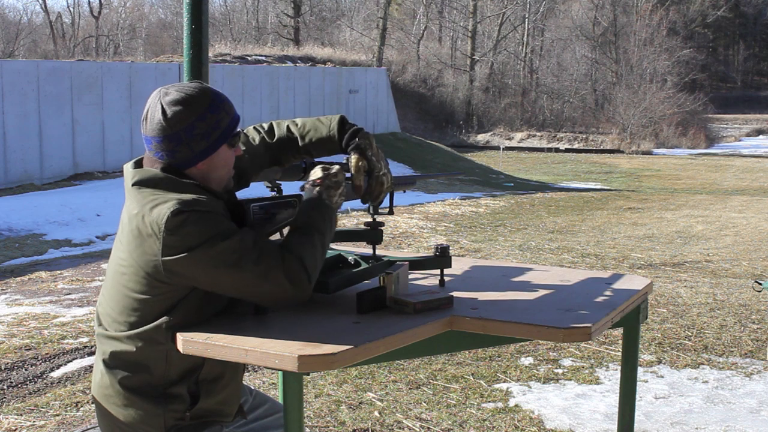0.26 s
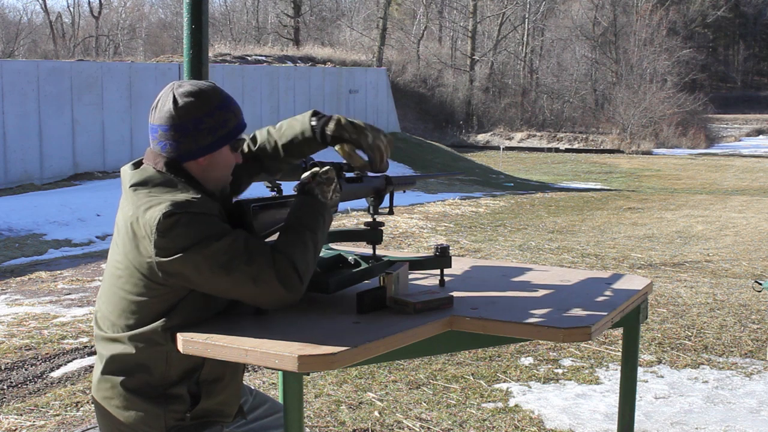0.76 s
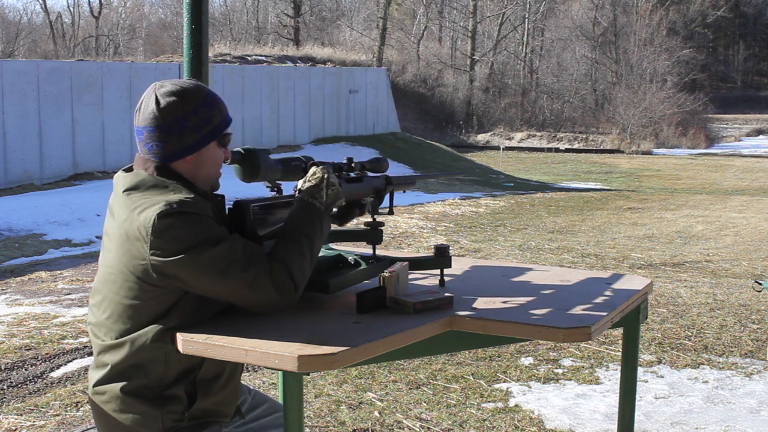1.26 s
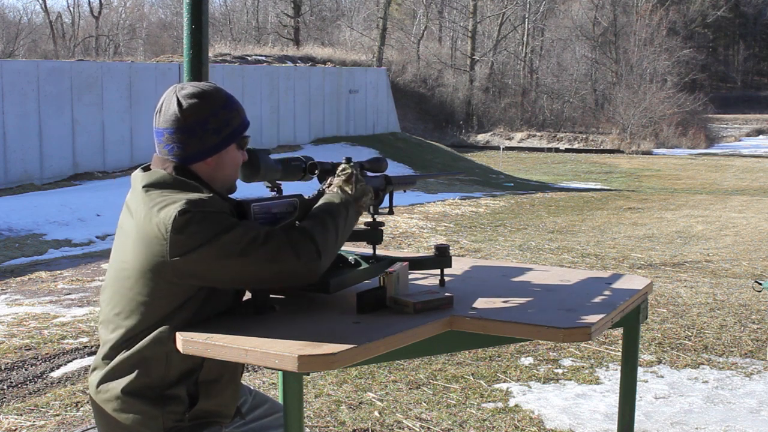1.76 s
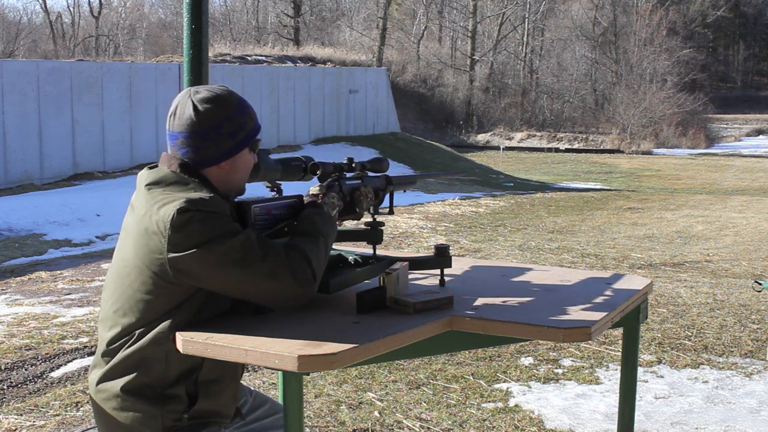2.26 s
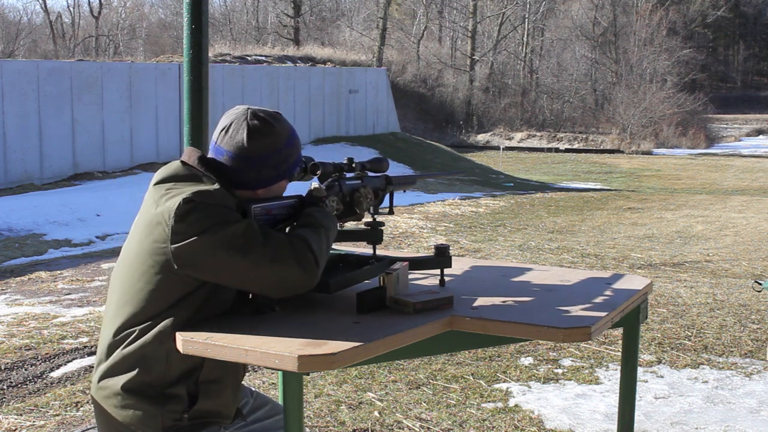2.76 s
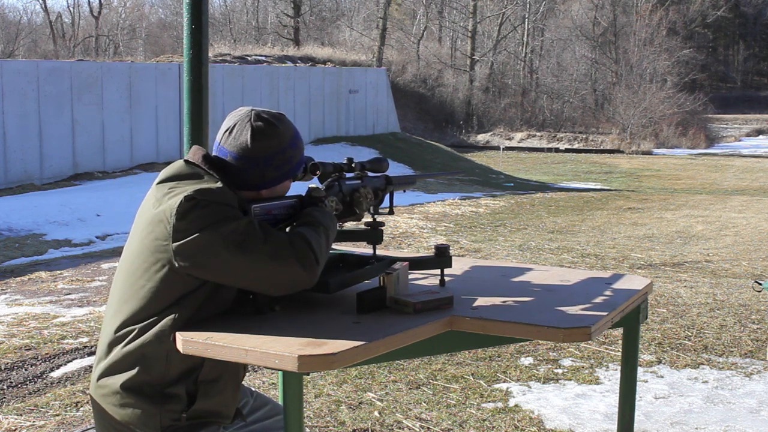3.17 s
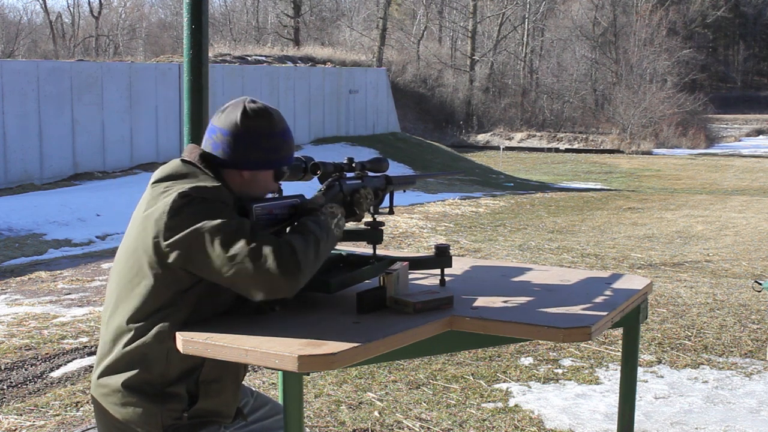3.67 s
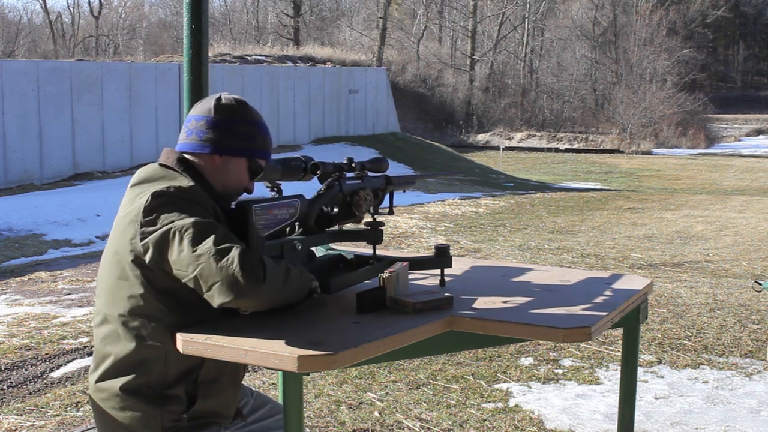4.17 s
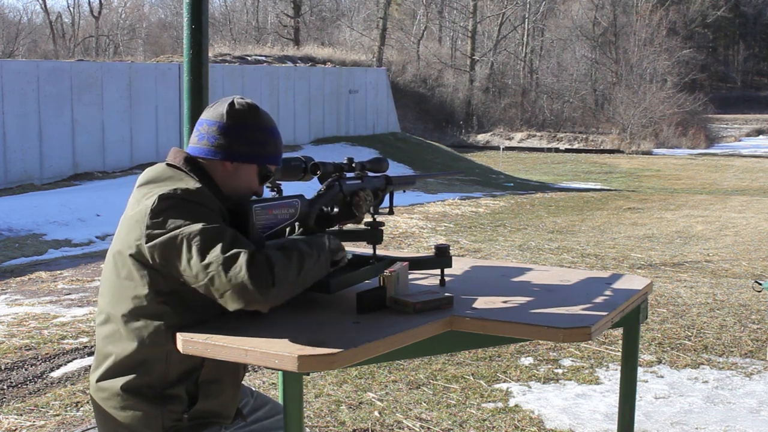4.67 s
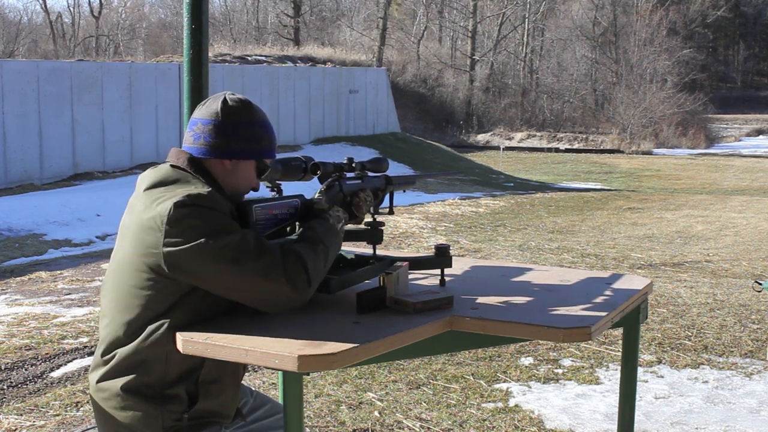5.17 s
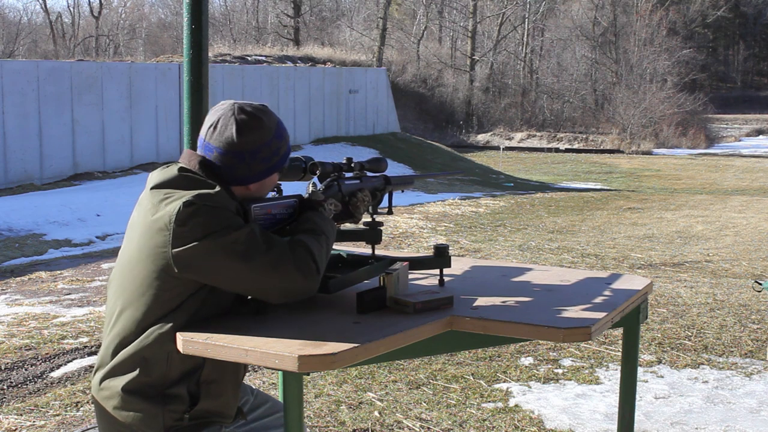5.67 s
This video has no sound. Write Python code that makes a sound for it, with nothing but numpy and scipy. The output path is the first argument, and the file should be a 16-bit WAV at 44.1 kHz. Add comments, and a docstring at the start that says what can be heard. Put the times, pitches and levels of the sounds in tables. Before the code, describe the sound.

Outdoors at a shooting bench, a steel rifle bolt is knocked and scraped back. A brass case strikes a steel frame with a bright ring and bounces away; the bolt is worked forward with hard clacks. Strong wind then thumps the close microphone, covering faint scuffs, before another case clinks on the frame. Knocks echo briefly under a shelter.

```python
"""Gusts rumble and flutter at the microphone from the start, over far outdoor noise and rustling clothes.
Soon a rifle bolt knocks and scrapes: short noise bursts, ringing steel and gritty rubbing.
A brass case hits a steel frame, rings as fading sines and bounces away over hard ground; the bolt is worked again.
The wind then swells into strong buffets, with soft scuffs on the bench; late on, a case drops on the frame again.
The knocks and clacks echo in an open shelter."""
import sys
import numpy as np
from scipy import signal
from scipy.fft import rfft, irfft
from scipy.io import wavfile
from scipy.ndimage import uniform_filter1d

SR = 44100
rng = np.random.default_rng(int(sys.argv[2]) if len(sys.argv) > 2 else 0)


def inscribe(sig):
    """Save sig as 16-bit PCM at rate SR to the path in sys.argv[1].

    A 1-D sig is mono; a 2-D sig holds one channel per row.
    Samples are clipped to [-1, 1] before scaling.
    """
    pcm = np.round(np.clip(np.atleast_2d(sig).T, -1, 1) * 32767)
    wavfile.write(sys.argv[1], SR, pcm.astype(np.int16))


N = 261072  # length in samples

# Far outdoor noise, its balance of pitches: pitch_hz, level_db (per Hz)
FAR_SPECTRUM = [(18, -44), (30, -13), (65, -6.5), (146, -16.5), (332, -20), (593, -13.5), (835, -17),
                (1060, -17.5), (3480, -36), (7280, -42.5), (13400, -40.5), (15200, -46), (16500, -60)]
FAR_DB = -54
# Rubbing cloth, its balance of pitches: pitch_hz, level_db (per Hz)
CLOTH_SPECTRUM = [(590, -29), (1000, 2), (1050, -5.5), (1190, -3), (6160, -16.5), (14000, -16.5),
                  (15900, -23), (16500, -48)]
# Spells of rustling clothes: start_s, length_s, level_db
RUSTLES = [(0, 0.11, -50), (.14, 0.24, -44.5), (1.9, 0.19, -60.5), (2.27, 0.17, -61.5), (2.49, 0.21, -61),
           (2.75, 0.23, -65.5), (3.31, 0.044, -62.5), (3.57, 0.71, -66.5), (4.33, 0.068, -56),
           (4.55, 0.3, -65.5), (5.2, .25, -67), (5.5, 0.17, -60), (5.8, .12, -61.5)]
RUSTLE_RISE, RUSTLE_FALL = 270, 110  # dB per s
# Something slides on the bench: start_s, length_s, level_db
BENCH_SCUFFS = [(3.741, 0.096, -56), (4.057, 0.041, -56.5), (4.102, 0.019, -56), (4.219, 0.058, -55.5),
                (5.455, 0.041, -57.5)]
# Tones of the bench: pitch_hz, width_hz, level_db
BENCH_TONES = [(1500, 400, 0), (2350, 700, -7)]

# Wind beneath the gusts, joined by straight lines: time_s, wind_db
WIND_LEVEL = [(0, -55), (.75, -53.5), (1, -78), (1.06, -53.5), (1.8, -63), (2.55, -41), (2.63, -30),
              (3.8, -29), (3.84, -77), (4.05, -70), (4.1, -27), (4.5, -43), (4.58, -55), (4.65, -45.5),
              (4.96, -85), (5.02, -62), (5.279, -77), (5.4, -44), (5.92, -46)]
# Gusts that can exceed that level: start_s, length_s, wind_db
WIND_GUSTS = [(0, .004, -19), (.19, 0.016, -20.5), (.42, 0.035, -32.5), (.575, .05, -36),
              (1.33, 0.017, -34.5), (1.44, 0.013, -27.5), (1.6, 0.021, -38.5), (1.71, 0.022, -47),
              (1.96, .01, -28.5), (2.052, 0.0081, -29.5), (2.13, .035, -31), (2.25, 0.022, -33.5),
              (2.34, 0.018, -41), (2.6, 0.11, -16), (2.785, 0.018, -15), (2.97, 0.053, -17.5),
              (3.165, .02, -14), (3.352, 0.029, -9), (3.475, 0.095, -15), (3.625, 0.12, -18.5),
              (3.91, 0.067, -24.5), (4.088, 0.021, -20.5), (4.205, .055, -25), (4.3, .12, -23.5),
              (4.47, .05, -28), (5.5, 0.09, -37)]
GUST_RISE, GUST_FALL = 596, 650  # dB per s
# Swirls of air from large to small: pitch_hz, level_db, follow (dB gained per dB of wind)
EDDIES = [(45, -9.5, 0.38), (71.6, -3, 0.52), (115, 2.5, 0.61), (176.0, 0.5, 0.77), (272.7, -5.5, 1.167),
          (423.6, -18, 1.61), (712, -27.5, 1.65), (1200, -36, 1.26), (2024, -53, 0.89)]
# The strongest single buffets: time_s, level_db, edge_db (rough flick against the swing)
STRONG_BUFFETS = [(0.1863, -16, -19), (0.208, -16, -30), (2.604, -18, -32), (2.6248, -11, -37),
                  (2.672, -9, -41), (2.6999, -8.5, -43), (2.715, -14.5, -22), (2.7303, -12.5, -25),
                  (2.787, -12, -37), (2.9705, -11, -45), (2.981, -8.5, -18.5), (3.0241, -11.5, -12),
                  (3.1787, -11.5, -20.5), (3.193, -12, -24), (3.335, -22, -14), (3.358, -9, -15),
                  (3.375, -6, -16), (3.407, -11.5, -17.5), (3.48, -16, -35), (3.509, -11, -31),
                  (3.523, -14.5, -19), (3.5356, -12, -37), (3.573, -14, -32), (3.622, -9, -24),
                  (3.6493, -15, -41.5), (3.7143, -13.5, -34), (3.914, -18, -18.5), (3.939, -12.5, -42),
                  (4.086, -15.5, -17), (4.213, -13, -40), (4.263, -21, -14), (4.3116, -12, -18),
                  (4.326, -21, -14), (4.408, -15, -30), (4.4711, -17, -30.5)]
BUFFET_HZ, BUFFET_HZ_PER_DB = 280.4, 6.5  # middle pitch at 0 dB; weaker buffets are slower
BUFFET_SPREAD = .25  # whole width of the chance pitch range, as a share of the pitch

# Knocks of the bolt: time_s, level_db, treble_db, strongest_ring_db (steel), case_ring_db (case inside)
BOLT_KNOCKS = [(0.093, -25, -32, -48, -70), (0.156, -22.5, 0, -54, -50), (0.2288, -19, -6.5, -43, -38.5),
               (0.2464, -3.5, 10, -42, -30), (0.313, -15.5, 4, -39.5, -33.5),
               (0.3344, -4, -7.5, -18, -30.5), (1.6309, -8, -4.5, -9, -42), (1.6496, -16.5, -7, -25, -33),
               (1.6768, -6, -9, -38, -28), (1.7037, -2.5, -7.5, -37, -39), (1.835, -17.5, -13, -48, -38),
               (1.8687, -7, -4.5, -37, -58), (2.4146, -16.5, -7.5, -41.5, -55),
               (3.8978, -27, -25, -74, -70), (4.0102, -32.5, -23, -70, -70)]
# Balance of pitches in a knock: pitch_hz, level_db (per Hz)
KNOCK_SPECTRUM = [(180, -50.5), (300, -16), (2380, -3.5), (3280, -5), (4280, -4.5), (7560, -6.5),
                  (9080, -8), (13800, -1), (16300, -14)]
# Ringing tones of the steel action, strongest first: pitch_hz, level_db, time_to_fall_60_db_s
ACTION_TONES = [(3110, 0, .05), (1000, -8, .035), (1770, -13, .02), (2300, -11, .025), (2500, -12, .03),
                (2930, -10, .03), (3400, -14, .025), (3900, -14, .025), (4480, -13, .025), (5600, -17, .02),
                (7300, -18, .02), (13000, -16, .02), (14300, -16, .04)]
KNOCK_T60_S = 0.041  # time to fall 60 dB
ACTION_RING_DB = -29  # base level of the weaker tones against the knock
# Sliding strokes of the bolt: start_s, length_s, friction_db, treble_db (against the mids)
BOLT_STROKES = [(0.166, 0.093, -38.5, -5), (0.32, 0.017, -36, -2.5), (1.635, .065, -25, -7),
                (1.85, .015, -34, -3)]
STROKE_RISE, STROKE_FALL = 265, 580  # dB per s

# Landings of the case: time_s, level_db, treble_db, frame_ring_db, case_ring_db, lowest_case_tone_db
CASE_LANDINGS = [(0.6228, -2.5, -10, -20.5, -24, -45), (0.7178, -22, -24, -37.5, -39, -31),
                 (0.7825, -18, -36, -34, -45, -60), (0.8494, -9, -1, -25, -29, -35),
                 (0.8881, -10.5, -30, -44, -32, -49), (0.9512, -18, -16, -33, -46, -46),
                 (1.0897, -11, -27, -42.5, -26, -28.5), (1.2623, -12.5, -15, -46.5, -26, -22),
                 (1.4176, -14, -38.5, -50, -30, -37), (1.5246, -12.5, -28.5, -40, -26.5, -35),
                 (1.6135, -15.5, -29, -31, -28.5, -30), (4.8042, -3, -3.5, -36, -22.5, -50),
                 (4.8112, -6.5, -9, -23, -27, -45), (4.8664, -32, -12, -46, -49, -45),
                 (4.8944, -22, -15, -40.5, -37, -60), (4.935, -30, -25, -47, -37, -46),
                 (4.9917, -24, -19, -40, -39.5, -48), (5.0315, -28, -23, -45, -54, -46),
                 (5.054, -29, -25, -45, -48.5, -50)]
# Balance of pitches in a landing's clack: pitch_hz, level_db (per Hz)
CLACK_SPECTRUM = [(180, -45.5), (300, -27), (1580, -9), (1930, -11), (2480, -8.5), (3760, -1.5),
                  (9090, -11), (9880, -3.5), (14500, -24), (16000, -36.5)]
# Ringing tones of the brass case, lowest first: pitch_hz, level_db, time_to_fall_60_db_s
BRASS_TONES = [(7612, 0, .22), (9700, -13, .2), (9865, 0, .26), (9885, -7, .26), (11500, -30, .1),
               (14040, -12, .18), (14075, -20, .18)]
# Ringing tones of the steel frame, hum first: pitch_hz, level_db, time_to_fall_60_db_s
FRAME_TONES = [(807, 0, .42), (533, -14, .2), (1147, -15, .3), (1416, -14, .4), (1930, -12, .4),
               (2062, -14, .5), (2085, -36, 1.6), (2250, -2, .1), (2600, -22, .45), (3128, -1, .19),
               (3440, -20, .3), (3690, -3, .1), (3750, -37.5, 1.8), (4400, -3, .08), (4850, -22, .3),
               (5483, -21, .3), (5700, -22, .3), (6315, -19, .2)]
CLACK_T60_S, T60_S_PER_DB = .058, -.0022  # fade at 0 dB and its change: soft landings clatter longer
HUM_DB = -2.5  # hum of the frame against its other tones, at a frame ring of -23 dB
HUM_GROWTH = .6  # hard blows raise the hum further: extra dB per dB of frame ring
GROUND_LOWS = .4  # the less the frame rings, the more the ground adds below 2 kHz: dB per dB
# Dull taps of the case's other end between bounces on the ground: time_s, level_db
DULL_TAPS = [(1.156, -32), (1.1737, -24), (1.2092, -28), (1.235, -32), (1.312, -26), (1.3376, -25),
             (1.365, -28), (1.39, -32), (1.4648, -23), (1.498, -25), (1.5208, -21)]
TAP_TREBLE_DB, TAP_T60_S = -46.5, .045
# Moments when the case is stilled: time_s
STILLED_TIMES = [1.632, 5.13]
STOP_S = .012  # its ring then shrinks to about a third in each such time

# Fading of the shelter's echo: pitch_hz, time_to_fall_60_db_s
SHELTER_FADE = [(400, 0.42), (1000, 0.35), (2800, 0.24), (7400, 0.22), (15000, 0.1)]
EDGE_HZ = 16000  # upper limit of the microphone's sound


def gain_of(db):
    """Turns decibels into a factor."""
    return 10 ** (np.asarray(db) / 20)


def evened(x):
    """Scales a sound to an rms (average strength) of 1."""
    return x / np.sqrt(np.mean(x ** 2) + 1e-20)


def read(points, hz):
    """Reads a table at the pitches hz, with straight lines over a logarithmic pitch scale."""
    f, value = np.transpose(points)
    return np.interp(np.log(hz + 1), np.log(f + 1), value)


def add(mix, s, sound):
    """Lays a sound into the mix at s seconds."""
    part = mix[round(s * SR):][:len(sound)]
    part += sound[:len(part)]


def coloured(x, db_of):
    """Filters x by a level in dB that depends on pitch."""
    hz = np.fft.rfftfreq(len(x), 1 / SR)
    return irfft(rfft(x) * gain_of(db_of(hz)), len(x))


def spells(rows, rise, fall):
    """Level in dB of events (start, length, dB) that each rise, hold and fall."""
    start, length, db = np.transpose(rows)[:3, :, None]
    t = np.arange(0, N + 64, 64) / SR
    before = np.maximum(start - t, 0)
    after = np.maximum(t - start - length, 0)
    each_db = db - rise * before - fall * after
    return np.interp(np.arange(N) / SR, t, each_db.max(0))


def patchy(spectrum, patchy_db, size):
    """Noise built from short random spectra, with louder and softer patches that drift."""
    frames, hz = 4 * N // size + 5, np.fft.rfftfreq(size, 1 / SR)
    real, imaginary, patches = rng.standard_normal((frames, len(hz), 3)).T
    patches = uniform_filter1d(patches, size=9, axis=0)
    patches = evened(uniform_filter1d(patches, size=12, axis=1))
    level_db = read(spectrum, hz)[:, None] + patchy_db * patches
    spectra = (real + 1j * imaginary) * gain_of(level_db)
    return evened(signal.istft(spectra, nperseg=size, noverlap=3 * size // 4)[1][:N])


def background():
    """Far outdoor noise, clothing that rustles as the arms move, and scuffs that excite the bench's tones."""
    far = gain_of(FAR_DB) * patchy(FAR_SPECTRUM, patchy_db=2.0, size=1024)
    rustle_gain = gain_of(spells(RUSTLES, RUSTLE_RISE, RUSTLE_FALL))
    out = far + rustle_gain * patchy(CLOTH_SPECTRUM, patchy_db=3.0, size=256)
    for s, length, db in BENCH_SCUFFS:
        noise = rng.standard_normal(round(length * SR))
        wood = np.zeros(len(noise))
        for hz, width_hz, tone_db in BENCH_TONES:
            b, a = signal.iirpeak(hz, hz / width_hz, SR)
            wood += gain_of(tone_db) * signal.filtfilt(b, a, noise)
        add(out, s, gain_of(db) * evened(wood) * signal.windows.tukey(len(noise), .4))
    return out


def puff(hz, edge_db, turns=0.45):
    """One eddy pushes the membrane: a lumpy swing of about a cycle, with a short rough flick at its top."""
    t = np.arange(-1500, 1500) / SR
    swing = np.exp(-.5 * (t * hz / turns) ** 2) * np.cos(2 * np.pi * (hz * t + rng.uniform(-0.11, 0.1)))
    flick_spectrum = [(300, -3.5), (700, 9.0), (1600, -7.0), (2800, -25), (4000, -52)]
    flick = coloured(rng.standard_normal(len(t)), lambda f: read(flick_spectrum, f))
    edge = evened(flick) * np.exp(-.5 * (t / 0.0021) ** 2)
    return rng.choice([-1, 1]) * (swing + gain_of(edge_db) * edge)


def wind():
    """Eddies of many sizes push the microphone; small ones gain more from stronger wind than the largest."""
    s, db = np.transpose(WIND_LEVEL)
    steady_db = np.interp(np.arange(N) / SR, s, db)
    wind_db = np.maximum(steady_db, spells(WIND_GUSTS, GUST_RISE, GUST_FALL))
    out = np.zeros(N)
    for hz, level_db, follow in EDDIES:
        # small eddies are rarer for their size and so stand out as single flicks
        draw, sign, luck = rng.random((N, 3)).T
        happens = draw < 130 * (115 / hz) ** .4 / SR
        strength = gain_of(-3. * np.log(luck + 0.00078))
        train = happens * np.sign(sign - .5) * strength
        eddies = evened(signal.oaconvolve(train, puff(hz, -60), "same"))
        out += eddies * gain_of(-37.0 + level_db + follow * (wind_db + 31))
    for s, db, edge_db in STRONG_BUFFETS:
        middle_hz = BUFFET_HZ + BUFFET_HZ_PER_DB * db
        hz = middle_hz * (1 + BUFFET_SPREAD * (rng.random() - .5))
        add(out, s - 1500 / SR, gain_of(db) * puff(hz, edge_db))
    return out


def tilt(hz, treble_db):
    """A treble shelf whose change builds up from 2 to 9 kHz."""
    return read([(2000, 0.00079), (9000, treble_db)], hz)


def burst(db_of, t60, rise, spike_db, treble_haste=0.87):
    """Dense short tones bunched in chance bands: a sharp front, then a tail whose treble fades a bit slower."""
    t = np.arange(8192) / SR
    noise, bands = rng.standard_normal((len(t), 2)).T
    bands = uniform_filter1d(uniform_filter1d(bands, size=40), size=40)
    bands_db = 2 * evened(bands)[:len(t) // 2 + 1]  # bands stand about 2 dB out
    x = evened(coloured(noise, lambda hz: db_of(hz) + bands_db))
    highs = coloured(x, lambda hz: read([(3500, -50.5), (6000, -6)], hz))
    fall_db = -60 * t / np.clip(t60, .008, .3)
    tail = (x - highs) * gain_of(fall_db) + highs * gain_of(treble_haste * fall_db)
    spike = x * gain_of(spike_db) * np.exp(-t / 0.0021)
    return 0.32 * (1 - np.exp(-t / rise)) * (tail + spike)


def ring(modes, first_db, rest_db, cycles, first_cycles, spin_db=0., scatter_db=0.0):
    """Fading sines that build up over some cycles; tone levels vary by blow, and a spinning body wavers."""
    hz, db, t60 = np.transpose(modes)[:, :, None]
    t = np.arange(round(SR * min(t60.max(), .9))) / SR
    luck, phase, spin, start = rng.random((len(modes), 4)).T[:, :, None]
    first = hz == hz[0]
    level_db = db + np.where(first, first_db, rest_db) + scatter_db * 3.1 * (luck - .5)
    waver_hz = 4.2 + 20. * spin
    level_db = level_db + spin_db * np.sin(2 * np.pi * (waver_hz * t + start))
    build = 1 - np.exp(-t * hz / np.where(first, first_cycles, cycles))
    tones = gain_of(level_db - 60 * t / t60) * np.sin(2 * np.pi * (hz * t + phase)) * build
    return tones.sum(0)


def slide(row):
    """Steel rubs on steel: hiss, and grit of which each grain rings one tone of the action."""
    draw, luck, hiss = rng.random((N, 3)).T
    grains = (draw < 1300 / SR) * gain_of(-4.5 * np.log(luck + 0.00057))
    mode = rng.integers(0, len(ACTION_TONES), N)
    t = np.arange(2000) / SR
    grit = np.zeros(N)
    for k, (hz, db, t60) in enumerate(ACTION_TONES):
        # the strongest tones are held back, and every tone fades a little faster than in a knock
        tone = gain_of(min(db, -9.5) - 65 * t / t60) * np.sin(2 * np.pi * hz * t)
        grit += signal.oaconvolve(grains * (mode == k), tone)[:N]
    steel_hiss = coloured(hiss - .5, lambda hz: read(KNOCK_SPECTRUM, hz))
    rub = evened(evened(grit) + 0.77 * evened(steel_hiss))
    highs = coloured(rub, lambda hz: read([(4500, -36.0), (7000, 5.5)], hz))
    balanced = rub + (gain_of(row[3]) - 1) * highs
    return gain_of(spells([row], STROKE_RISE, STROKE_FALL)) * balanced


def bolt():
    """Steel parts knock at lugs and stops, ringing the action and the case, with sliding between them."""
    out = np.zeros(N)
    held = np.multiply(BRASS_TONES, [1, 1, .5])[1:]  # a gripped case dies twice as fast; lowest tone left out
    for s, db, treble_db, strongest_db, brass_db in BOLT_KNOCKS:
        steel = ring(ACTION_TONES, strongest_db, db + ACTION_RING_DB,
                     cycles=3.4, first_cycles=9.2, scatter_db=0.5)
        brass = ring(held, brass_db, brass_db, cycles=27.0, first_cycles=27., spin_db=7.0)
        knock = burst(lambda hz: read(KNOCK_SPECTRUM, hz) + tilt(hz, treble_db),
                      KNOCK_T60_S, rise=0.001, spike_db=4.5 + .4 * db)
        for sound in (steel, brass, gain_of(db) * knock):
            add(out, s - .001, sound)
    return out + sum(slide(row) for row in BOLT_STROKES)


def case():
    """Each landing clacks and rings the spinning brass tube and, to a varying degree, the steel frame."""
    clacks, rings = np.zeros((2, N))
    for s, db, treble_db, frame_db, brass_db, lowest_db in CASE_LANDINGS:
        hum_db = frame_db + HUM_DB + HUM_GROWTH * (frame_db + 23.)
        frame = ring(FRAME_TONES, hum_db, frame_db, cycles=8.9, first_cycles=21.0, spin_db=1.8, scatter_db=1.2)
        add(rings, s - .001, frame)
        brass = ring(BRASS_TONES, lowest_db, brass_db, cycles=4.3, first_cycles=160.0, spin_db=1.5)
        next_stop = min(stop for stop in STILLED_TIMES if stop > s)
        late = s + np.arange(len(brass)) / SR - next_stop
        add(rings, s - .001, brass * np.exp(-np.maximum(late, 0) / STOP_S))
        lows = [(1900, GROUND_LOWS * (db - frame_db - 26.)), (2700, 0)]
        clack = burst(lambda hz: read(CLACK_SPECTRUM, hz) + read(lows, hz) + tilt(hz, treble_db),
                      CLACK_T60_S + T60_S_PER_DB * db, rise=.0022, spike_db=1.5 + .3 * db)
        add(clacks, s - .0015, gain_of(db) * clack)
    for s, db in DULL_TAPS:
        tap = burst(lambda hz: read(CLACK_SPECTRUM, hz) + tilt(hz, TAP_TREBLE_DB),
                    TAP_T60_S, rise=.003, spike_db=-6.)
        add(clacks, s - .0015, gain_of(db) * tap)
    return clacks, rings


def shelter(x):
    """Roof, bench and ground send back sparse taps of random sign, each band dying at its own speed."""
    taps = np.zeros(SR // 2)
    at = np.arange(200, len(taps) - 20, 20)
    taps[at + rng.integers(0, 20, len(at))] = rng.choice([-1., 1.], len(at))
    hz, t, spectra = signal.stft(taps, SR, nperseg=256)
    fade = gain_of(-60 * t / read(SHELTER_FADE, hz)[:, None])
    tail = signal.istft(spectra * fade, SR, nperseg=256)[1]
    return signal.fftconvolve(x, tail / np.linalg.norm(tail))[:N]


def scene():
    """Blows echo in the shelter; case and frame rings stay dry; wind acts on the microphone itself."""
    clacks, rings = case()
    blows = bolt() + clacks
    echo = gain_of(-9.5) * shelter(blows)
    return (blows + echo + rings + wind() + background())[None]


def record(dry):
    """A bass cut, an input stage that rounds the highest peaks, and the upper pitch limit."""
    bass_cut = signal.butter(2, 45., "high", fs=SR, output="sos")
    thin = signal.sosfilt(bass_cut, dry)
    rounded = .9 * np.tanh(thin / .9)
    band_limit = signal.firwin(151, EDGE_HZ, window=("kaiser", 9), fs=SR)
    return signal.oaconvolve(rounded, band_limit[None], "same")


dry = scene()
out = record(dry)
inscribe(out)
```